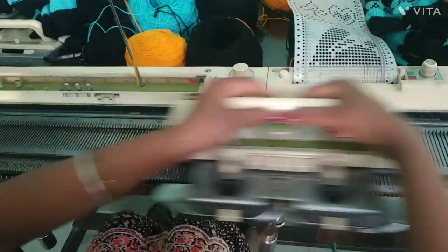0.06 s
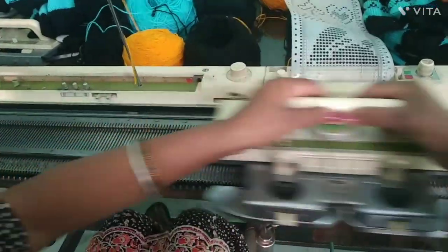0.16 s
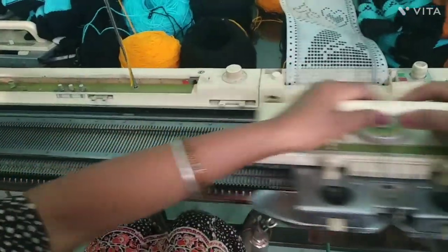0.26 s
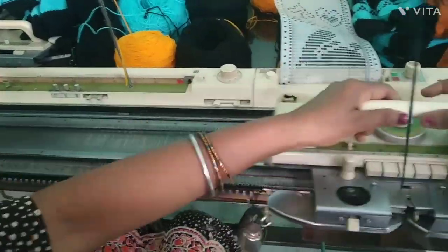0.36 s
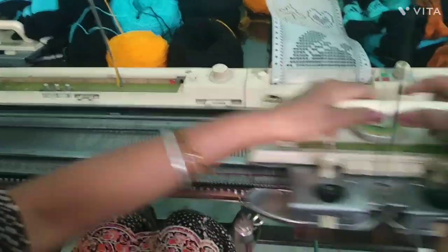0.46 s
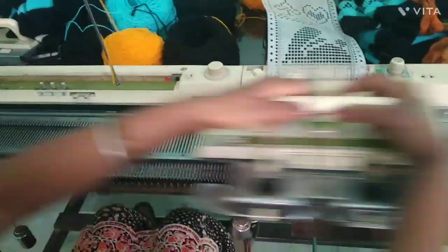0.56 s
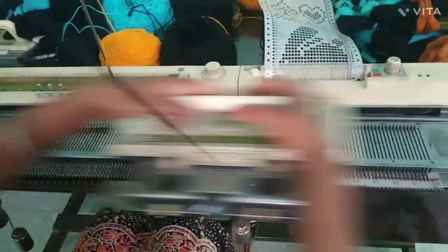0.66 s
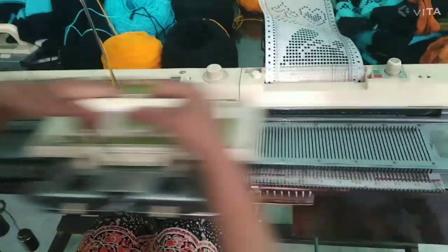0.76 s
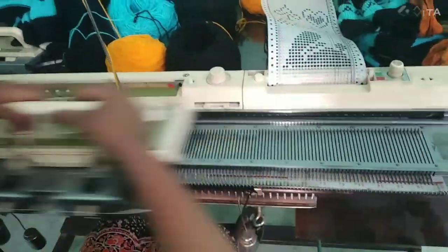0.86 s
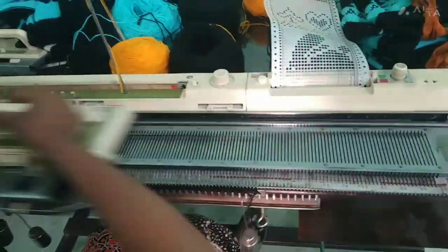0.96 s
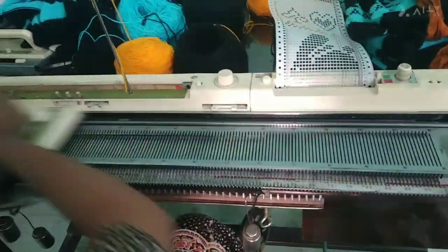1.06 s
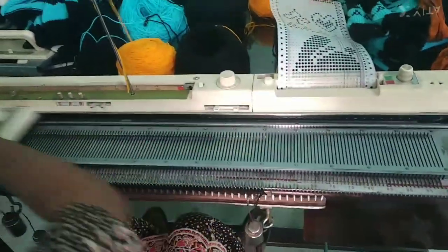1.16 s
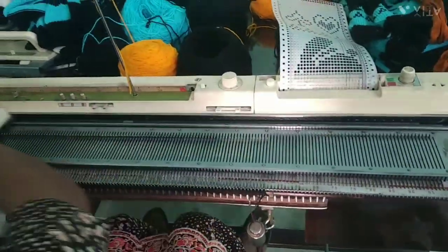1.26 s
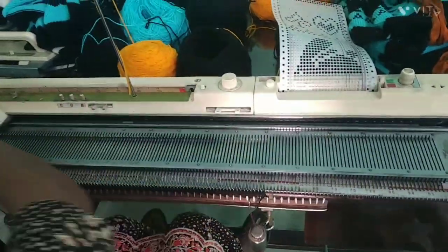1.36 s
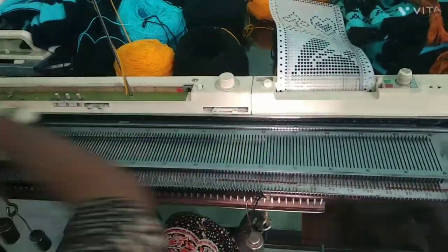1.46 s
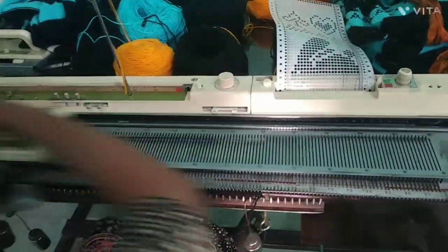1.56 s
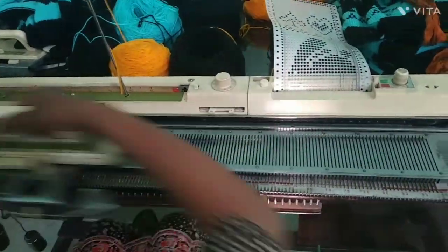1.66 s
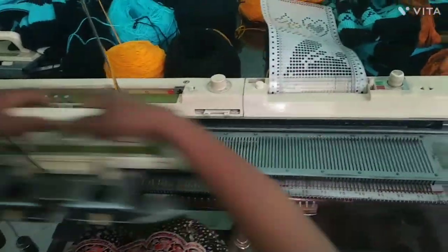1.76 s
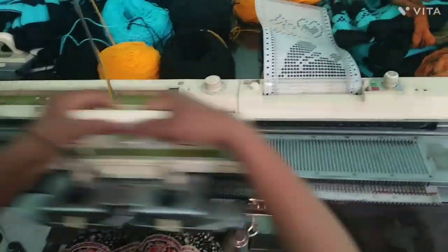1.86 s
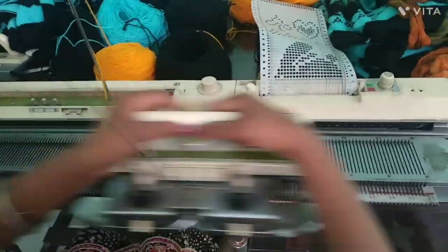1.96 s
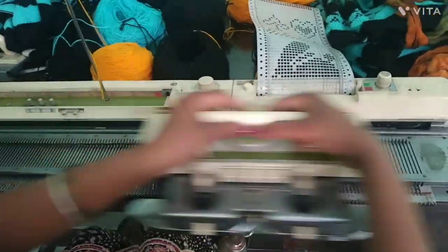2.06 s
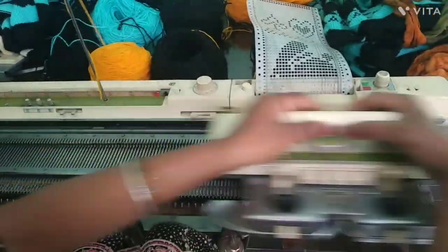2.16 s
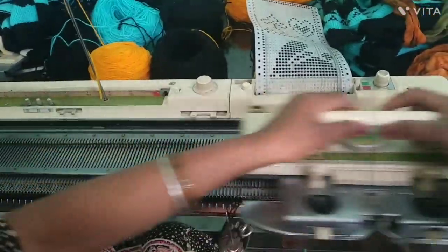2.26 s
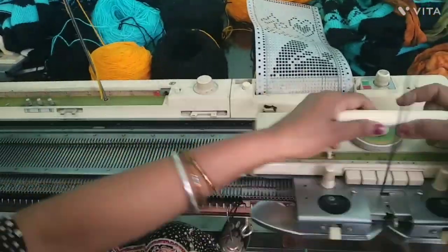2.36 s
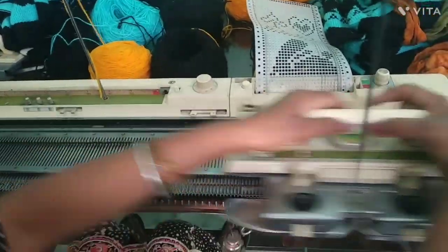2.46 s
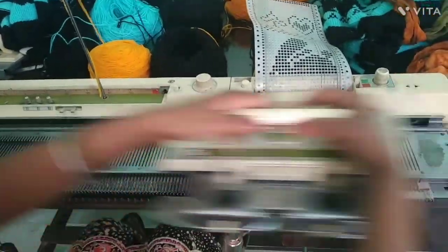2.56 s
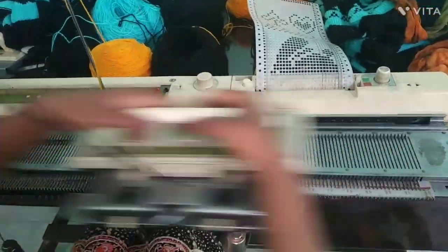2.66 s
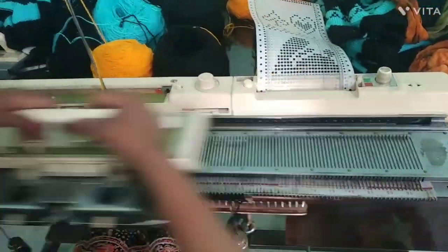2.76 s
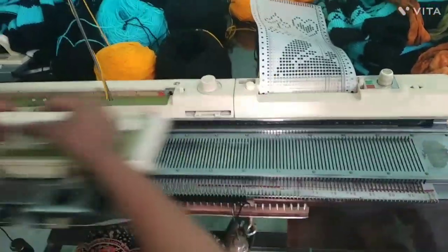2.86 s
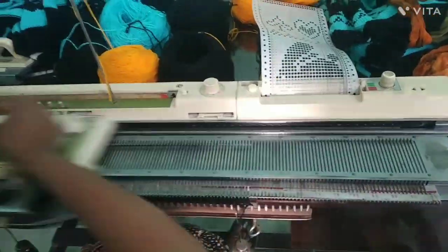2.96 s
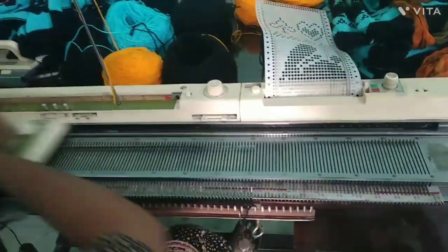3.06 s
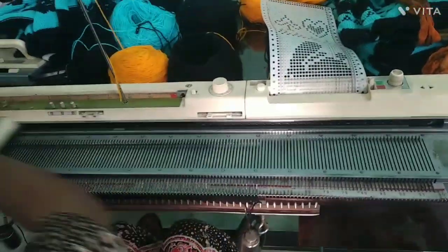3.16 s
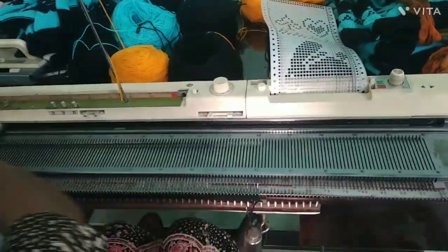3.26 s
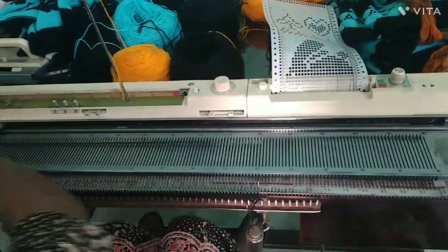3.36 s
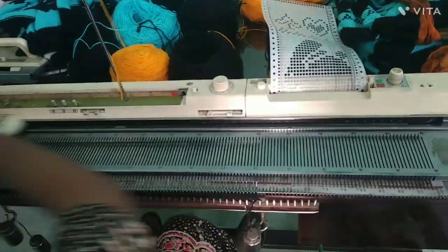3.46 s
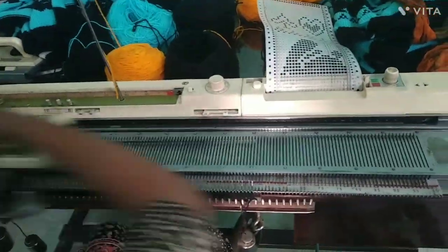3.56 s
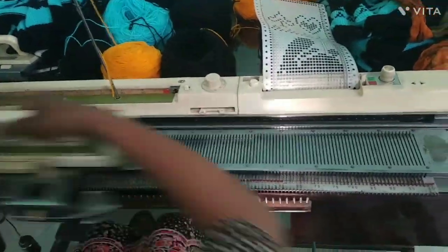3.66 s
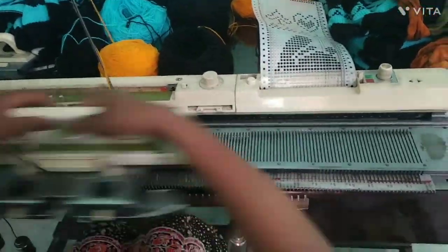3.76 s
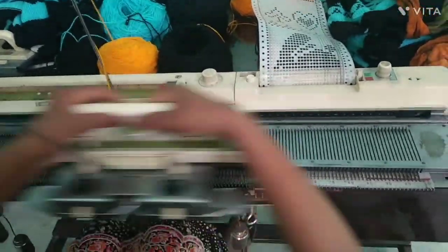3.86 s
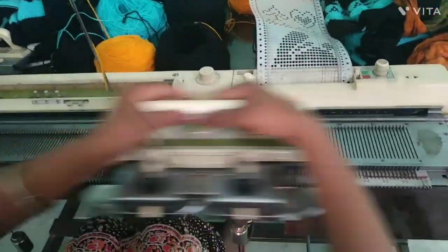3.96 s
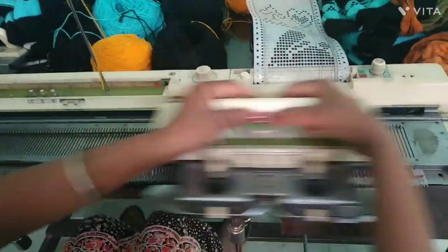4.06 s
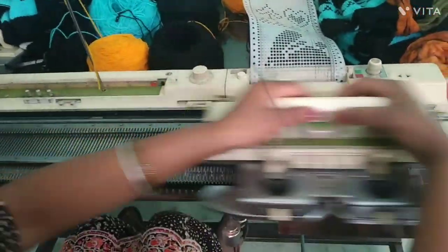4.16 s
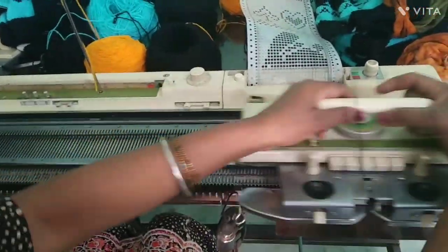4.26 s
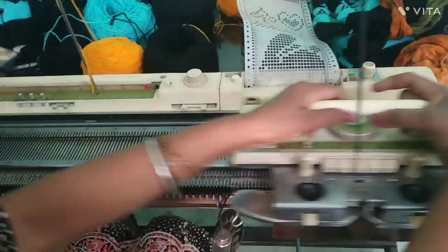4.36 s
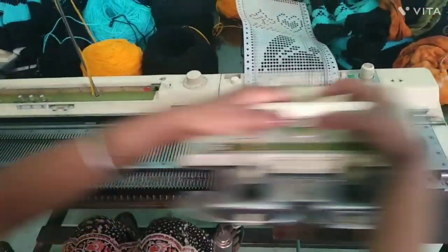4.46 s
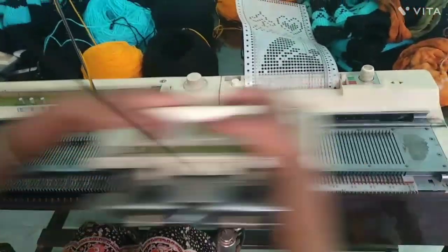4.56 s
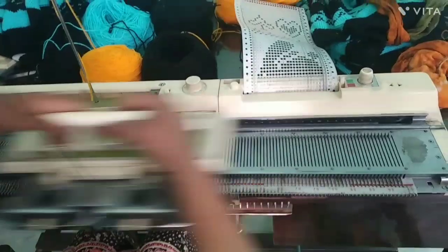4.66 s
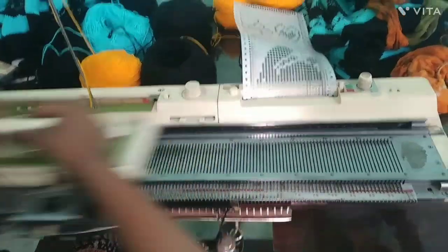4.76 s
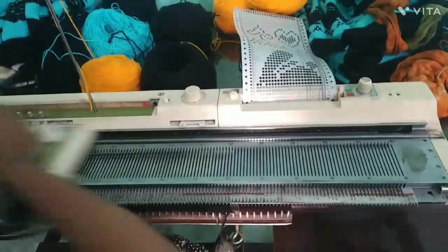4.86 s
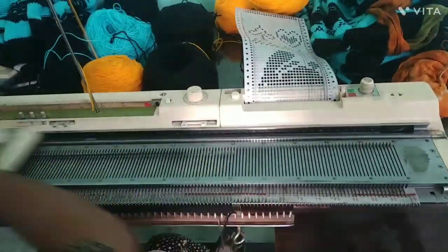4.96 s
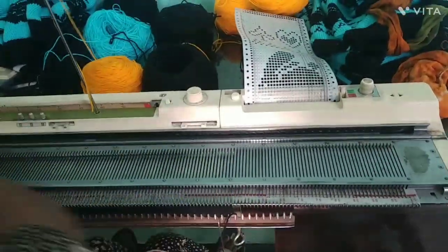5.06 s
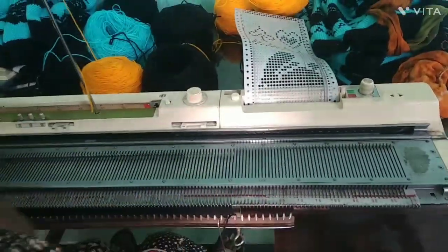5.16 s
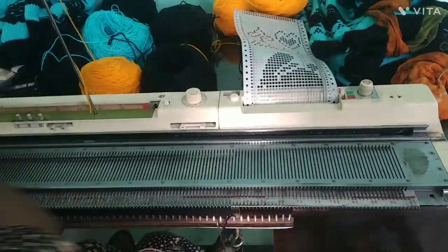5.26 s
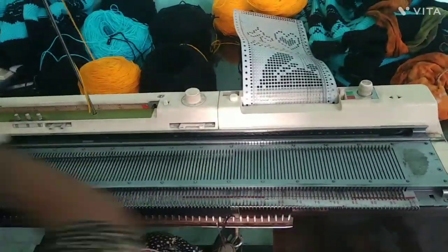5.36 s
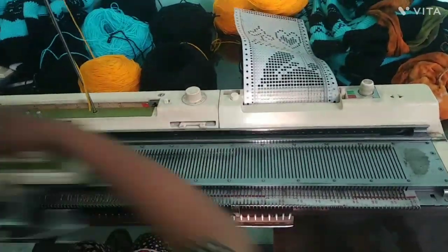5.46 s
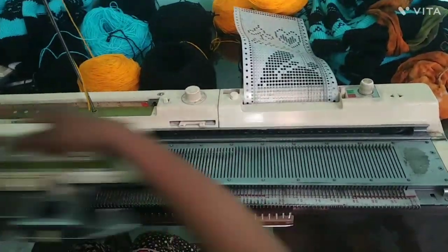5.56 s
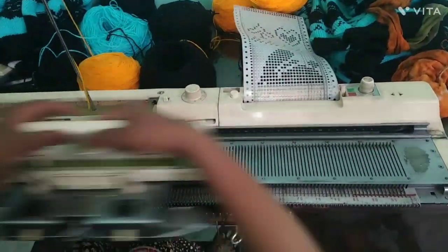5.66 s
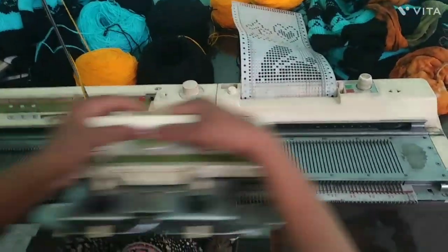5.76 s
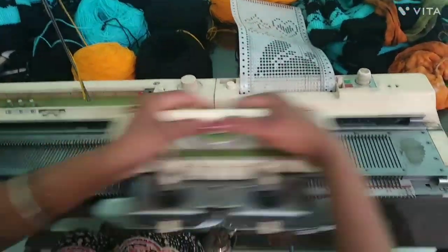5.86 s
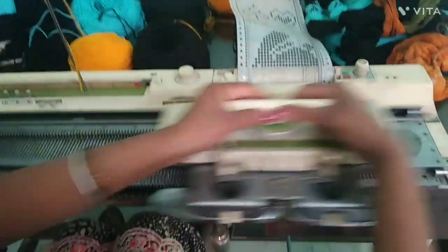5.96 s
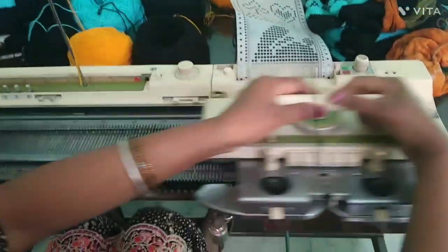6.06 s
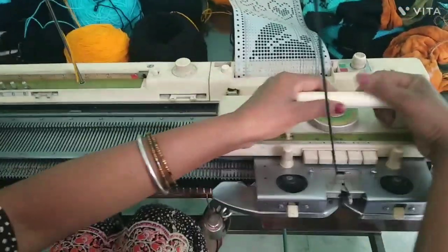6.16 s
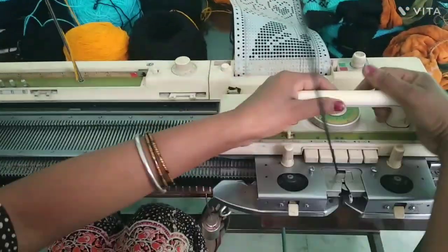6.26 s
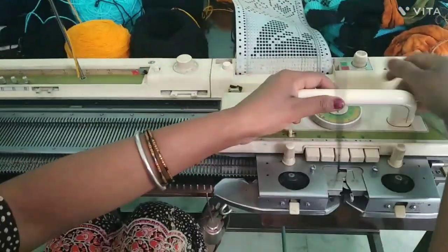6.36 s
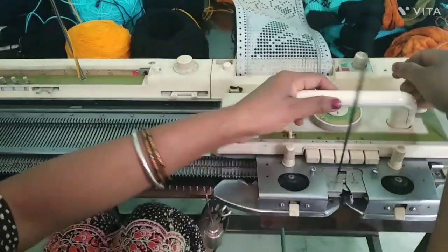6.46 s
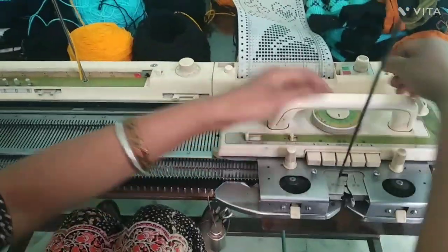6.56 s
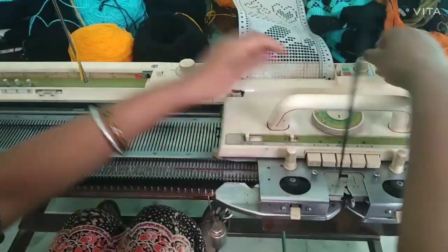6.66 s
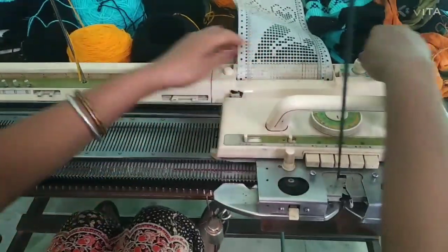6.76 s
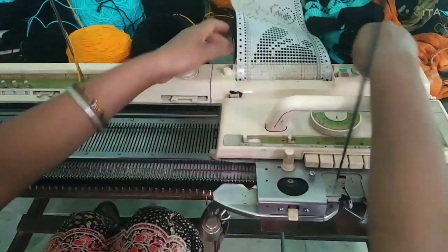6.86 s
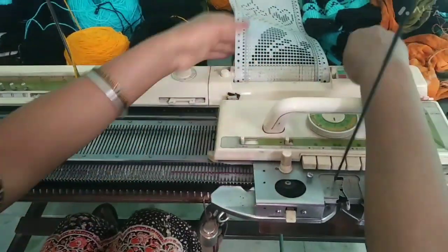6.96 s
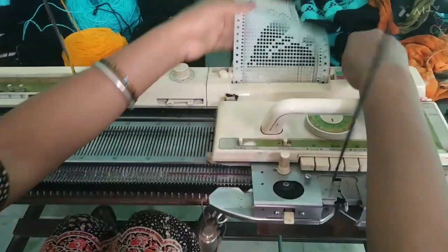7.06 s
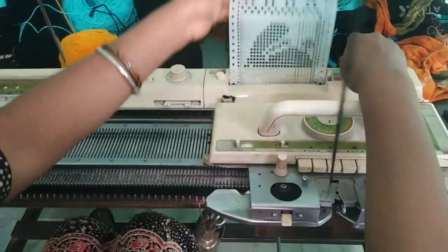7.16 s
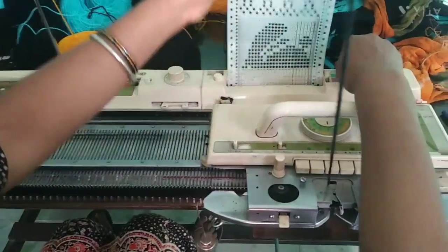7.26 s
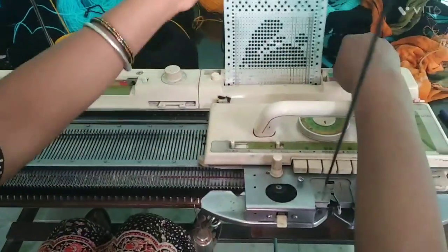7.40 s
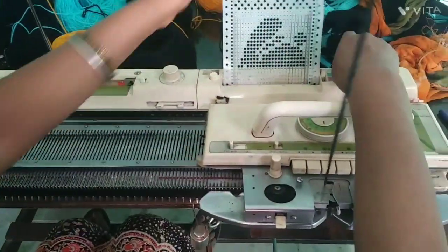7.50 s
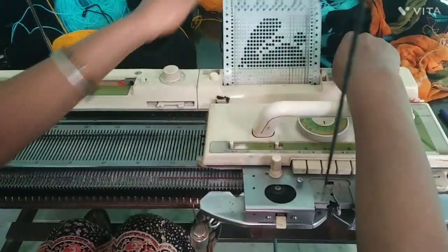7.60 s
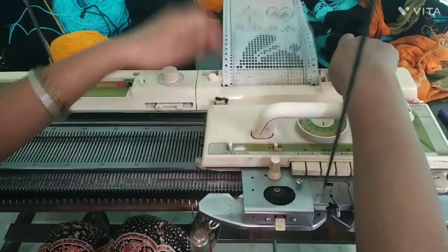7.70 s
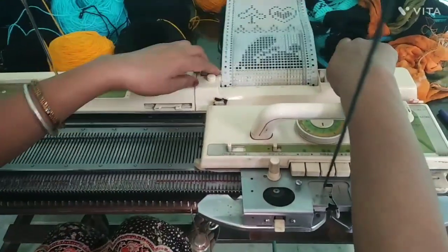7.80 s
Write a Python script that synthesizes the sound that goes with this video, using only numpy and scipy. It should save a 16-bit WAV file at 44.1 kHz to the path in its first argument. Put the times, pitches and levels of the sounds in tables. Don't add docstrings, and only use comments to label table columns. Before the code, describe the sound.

Close, slightly gritty mono sound of a knitting carriage sweeping across its needle bed roughly once a second. Dense, bright metallic rattle and hiss rise and fall, with a buzzing whine underneath and table rumble as each pass slows. Sharp needle snaps mark some reversals. The last full pass dies away, then a plastic catch clicks and faint taps follow in the quiet room.

```python
import sys
import numpy as np
from scipy import signal
from scipy.fft import rfft, irfft, next_fast_len
from scipy.io import wavfile
from scipy.ndimage import uniform_filter1d

SR = 44100
rng = np.random.default_rng(int(sys.argv[2]) if len(sys.argv) > 2 else 0)


def transcribe(signal):
    frames = np.atleast_2d(signal).T
    limited = np.clip(frames, -1, 1)
    pcm = np.round(limited * 32767).astype(np.int16)
    wavfile.write(sys.argv[1], SR, pcm)


def rack_gain(trim_db):
    fader = np.asarray(trim_db, float)
    return 10 ** (fader / 20)


N = 345347
SIZE = next_fast_len(N)
HZ = np.fft.rfftfreq(SIZE, 1 / SR)
TIME_S = np.arange(N) / SR
COARSE_S = TIME_S[::64]

# sets off [s], at full speed [s], brakes [s], at rest [s], force [dB].
STROKES = [
    (-.7, -.5, -.03, .3, -18.3),
    (.37, .585, 1.03, 1.38, -19),
    (1.5, 1.655, 2.05, 2.34, -16.9),
    (2.4, 2.615, 3.07, 3.41, -18.2),
    (3.48, 3.645, 4.07, 4.37, -17.7),
    (4.43, 4.62, 5.04, 5.36, -18.3),
    (5.46, 5.59, 5.98, 6.28, -16.3),
    (6.31, 6.49, 6.91, 7.26, -17.8),
    (7.72, 8.0, 8.4, 8.7, -43),
]
# frequency [Hz], density [dB per Hz].
STEEL = [(240, -51), (400, -16.5), (653, -17), (749, -12), (1000, -12), (1130, -13.5), (1880, -21.5),
         (2470, -18), (2790, -13.5), (3520, -15), (6290, -13), (8810, -5.5), (10700, 2.5), (13500, -4),
         (15500, -8)]
EDGES_HZ = (400, 1800, 6000)
# time [s], gain [dB].
FADE = [(0, -1.5), (7.0, 1.5), (7.4, -8.5), (7.83, -14.5)]
# level under the force [dB], shares of run-up, sag and
# braking [ratio], level at rest [dB].
RATTLE = (0.1, 1.01, 1.01, 1.01, -73)


def evened(x):
    return x / np.sqrt(np.mean(x ** 2) + 1e-20)


def read_log(points, hz):
    f, value = np.transpose(points)
    return np.interp(np.log(hz + 1), np.log(f + 1), value)


def fade_db(time_s):
    return np.interp(time_s, *np.transpose(FADE))


def above(edge_hz):
    return 1 / (1 + (edge_hz / (HZ + 1)) ** 12)


def coloured(x, points, share):
    gain = rack_gain(read_log(points, HZ)) * np.sqrt(share)
    return evened(irfft(rfft(x, SIZE) * gain, SIZE)[:N])


def smoothed(x):
    return uniform_filter1d(uniform_filter1d(x, size=500), size=500)


def push(part, jolt_db=0, jolt_s=1):
    rise_db, rise_bend = 46, 1.8
    surge_db, surge_s, sag_db = 1.2, .05, 4.4
    brake_db, brake_bend = 41, 1.25
    jolt_late_s = .11
    under_db, rise, sag, brake, rest_db = part
    power = rack_gain(2 * (rest_db + fade_db(COARSE_S)))
    for start, full, slow, stop, force_db in STROKES:
        before = np.maximum((full - COARSE_S) / (full - start), 0)
        after_s = np.maximum(COARSE_S - full, 0)
        braking = np.maximum((COARSE_S - slow) / (stop - slow), 0)
        surge = surge_db * (1 - np.exp(-after_s / surge_s))
        tiring = sag_db * np.minimum(after_s / (slow - full), 1)
        loss = rise * rise_db * before ** rise_bend + sag * (surge + tiring)
        loss = loss + brake * brake_db * braking ** brake_bend
        jolt = jolt_db * np.exp(-((COARSE_S - slow - jolt_late_s) / jolt_s) ** 2)
        power = power + rack_gain(2 * np.maximum(force_db + under_db - loss + jolt, -200))
    return np.interp(TIME_S, COARSE_S, np.sqrt(power))


def clatter(per_s, spread_db, hiss, patchy_db):
    chance, size = rng.random(N), rng.exponential(1, N)
    sign, slide = rng.standard_normal(N), rng.standard_normal(N)
    busy = np.clip(push(RATTLE) / rack_gain(-40), .2, 1) * per_s / SR
    knocks = sign * rack_gain(spread_db * np.minimum(size, 3)) * (chance < busy) / np.sqrt(busy)
    z = signal.stft(evened(knocks) + hiss * slide, nperseg=256, noverlap=192)[2]
    patches = rng.standard_normal(z.shape[::-1]).T
    patches = uniform_filter1d(patches, size=4, axis=0)
    patches = evened(uniform_filter1d(patches, size=14, axis=1))
    return signal.istft(z * rack_gain(patchy_db * patches), nperseg=256, noverlap=192)[1][:N]


def needles():
    # [dB], three shares [ratio], at rest [dB].
    plate_push = (-14.5, 1.05, .6, .72, -74)
    body_push = (-22.5, .9, .3, .58, -71)
    body, plate, bright = (above(f) for f in EDGES_HZ)
    x = clatter(per_s=9000, spread_db=1.6, hiss=1, patchy_db=1.5)
    out = rack_gain(0.1) * push(RATTLE) * coloured(x, STEEL, bright)
    out = out + rack_gain(-1.26) * push(plate_push) * coloured(x, STEEL, plate - bright)
    return out + rack_gain(-2.67) * push(body_push) * coloured(x, STEEL, body - plate)


def table():
    # frequency [Hz], density [dB per Hz].
    rumble_spectrum = [(53, -38.5), (90, -12.5), (124, -2.5), (178, -3.5), (258, -2.5), (325, -3),
                       (386, -2.5), (449, -9.5), (500, -13.5), (650, -44.5), (1100, -120)]
    # frequency [Hz], width [Hz], level [dB].
    table_modes = [(132.4, 9, 3), (170, 40, -9)]
    # frequency [Hz], density [dB per Hz].
    room_spectrum = [(15, -2.5), (25, 2.5), (60, -0.5), (100, 1), (170, -1), (300, -8), (420, -24.5)]
    # [dB], three shares [ratio], at rest [dB].
    board_push = (-33, .55, .25, .42, -69)
    room_db = -65
    modes = sum(rack_gain(db) / (1 + 1j * (HZ - hz) / width) ** 2 for hz, width, db in table_modes)
    ring = evened(irfft(rfft(rng.standard_normal(SIZE)) * modes, SIZE)[:N])
    rumble = coloured(rng.standard_normal(N), rumble_spectrum, 1 - above(EDGES_HZ[0]))
    room = rack_gain(room_db + fade_db(TIME_S)) * coloured(rng.standard_normal(N), room_spectrum, 1)
    shoved = rack_gain(-0.6) * push(board_push, jolt_db=6.5, jolt_s=.09) * rumble
    return shoved + rack_gain(-11) * push(board_push) * ring + room


def thumps():
    # time [s], peak [dB], first pitch [Hz].
    knocks = [
        (.05, -53, 140),
        (1.14, -47, 140),
        (2.1, -46, 200),
        (3.1, -45, 150),
        (4.12, -41, 200),
        (5.04, -47, 140),
        (6.04, -44, 200),
        (6.97, -50, 140),
    ]
    mode_hz, sink_s, rise_s, t60_s, rough = 126, .045, .015, .6, .6
    age, out = np.arange(SR // 2) / SR, np.zeros(N)
    for s, peak_db, first_hz in knocks:
        hz = mode_hz + (first_hz - mode_hz) * np.exp(-age / sink_s)
        shape = (1 - np.exp(-(age / rise_s) ** 2)) * rack_gain(peak_db + 1.2 - 60 * age / t60_s)
        a, b = (evened(v) for v in smoothed(rng.standard_normal((2, len(age)))))
        turn = np.exp(2j * np.pi * np.cumsum(hz) / SR)
        out[round(s * SR):][:len(age)] += shape * (turn * (1 + rough * (a + 1j * b))).imag
    return out


def ticks():
    # time [s], peak [dB], lower band relative # to
    # needles [dB].
    lone_needles = [(0.334, -32.5, -18), (0.374, -37, -18), (0.3925, -33.5, -16), (0.4065, -30, -17),
                    (1.512, -30.5, -16), (1.5553, -20, -11), (2.3585, -43, -19), (2.3724, -45.5, -15),
                    (2.4184, -35, -18), (2.4304, -28, -18), (2.492, -14.5, -20), (3.16, -20, -15),
                    (3.458, -37, -15), (3.497, -37, -13), (3.5224, -27.5, -16), (3.549, -18.5, -17),
                    (4.2036, -19, -19), (4.4074, -31.5, -29), (4.452, -22, -24), (6.3121, -27, -24),
                    (5.3797, -38.5, -12), (5.468, -35, -15), (5.509, -18.5, -18.5), (6.2667, -39, -21),
                    (6.303, -28, -23), (6.335, -21, -23), (6.2751, -36.5, -20), (7.4027, -49.5, 6.5),
                    (7.772, -60, 3), (7.8156, -41.5, -28)]
    rise_s, crack_t60_s = 0.00082, 0.016
    tail_db, tail_t60_s = -15, .065
    echo_db, echo_t60_s = -15, .7
    body, _, bright = (above(f) for f in EDGES_HZ)
    x = rng.standard_normal(N)
    high, low = coloured(x, STEEL, bright), coloured(x, STEEL, body - bright)
    age, out = np.arange(SR // 2) / SR, np.zeros(N)
    decay = rack_gain(-60 * age / crack_t60_s)
    decay = decay + rack_gain(tail_db - 60 * age / tail_t60_s) + rack_gain(echo_db - 60 * age / echo_t60_s)
    decay = (1 - np.exp(-age / rise_s)) * decay
    for s, db, low_db in lone_needles:
        start = round(s * SR)
        part = slice(start, min(start + len(age), N))
        shape = rack_gain(db - 8) * decay[:len(out[part])]
        out[part] += shape * (high[part] + rack_gain(low_db) * low[part])
    return out


def hum(stroke, pace):
    # frequency [Hz], level [dB].
    favoured = [(170, -4), (225, -8), (266, -.3), (330, -7), (520, -11), (780, -5), (1010, 1.2), (1500, -7)]
    eased_hz, brake_hz_per_s, tail_s = 260, 480, .14
    wobble, uneven_db, blur_rad = .012, 4.5, .45
    hold_s, fade_db_per_s = .2, 50
    whine_rise_s, whine_rise_db = .18, 7
    whine_drop_db_per_s = 70
    _, full, slow, *_ = stroke
    top_hz, cruise_hz, ease, hum_db, whine_db = pace
    start = full - .04
    t = np.arange(start, slow + tail_s, 1 / SR)
    braking_s = np.maximum(t - slow, 0)
    hz = np.interp(t, [full, full + ease * (slow - full), slow], [top_hz, eased_hz, cruise_hz])
    hz = hz - brake_hz_per_s * braking_s
    drift = smoothed(rng.standard_normal((11, SR))[:, :len(t)])
    drift = np.clip(drift / drift.std(), -3, 1.5)
    turns = np.cumsum(hz * (1 + wobble * drift[0])) / SR
    low_db = hum_db - fade_db_per_s * np.clip(t - full - hold_s, 0, .2)
    high_db = whine_db - whine_rise_db * np.maximum(1 - (t - start) / whine_rise_s, 0)
    high_db = high_db - whine_drop_db_per_s * braking_s
    tone = 0
    for k, db in enumerate([low_db] + [high_db] * 4, 1):
        level = rack_gain(db + read_log(favoured, k * hz) + uneven_db * drift[k])
        tone = tone + level * np.cos(2 * np.pi * k * turns + blur_rad * drift[-k])
    tone = np.sqrt(2) * tone * signal.windows.tukey(len(t), .2)
    return np.pad(tone, (round(start * SR), N))[:N]


def catch():
    # time [s], peak [dB], pitch factor [ratio].
    clicks = [
        (7.4027, -44, 1),
        (7.4924, -56, .5),
        (7.5647, -58, .5),
        (7.781, -60, .3),
        (7.795, -61, .3),
        (7.812, -59, .3),
    ]
    # frequency [Hz], level [dB], t60 [s].
    plastic_modes = [(1900, -5, .025), (2300, 0, 0.022), (3100, -12, .1), (3500, -9, .14), (5200, -1, .015),
                     (5900, -5, .015)]
    age, out = np.arange(SR // 8) / SR, np.zeros(N)
    for s, peak_db, pitch in clicks:
        ring = 0
        for hz, db, t60_s in plastic_modes:
            decay = rack_gain(db - 60 * age / (t60_s * pitch))
            ring = ring + decay * np.sin(2 * np.pi * hz * pitch * age)
        part = out[round(s * SR):][:len(age)]
        part += (rack_gain(peak_db + 0.5) * ring / abs(ring).max())[:len(part)]
    return out


def scene():
    # fastest [Hz], cruising [Hz], share of the run spent
    # easing to cruise [ratio], hum [dB], whine [dB].
    paces = [
        (277, 224, .22, -42, -50),
        (335, 252, .8, -45, -47),
        (290, 225, .42, -43, -47),
        (335, 230, .43, -47, -45.5),
        (298, 245, .33, -43, -48),
        (365, 252, .75, -46, -47),
        (310, 235, .4, -46, -51),
    ]
    hums = rack_gain(-2.0) * sum(map(hum, STROKES[1:], paces))
    mono = needles() + table() + thumps() + ticks() + hums + catch()
    return np.array([mono, mono])


def squeezed(x, faint_db=-55, hole_db=-17, size=1024):
    # frequency [Hz], step over band rms [dB].
    coarseness = [(300, -6), (1200, 4), (2200, 6), (3200, 8), (6500, 8), (9000, 5), (15000, 6.5)]
    # frequency [Hz], share [ratio].
    left_out = [(300, 0), (2500, .01), (4500, .03), (8000, .05), (10000, .15), (15000, .18)]
    n, k = np.arange(2 * size), np.arange(size)
    window = signal.windows.kaiser_bessel_derived(2 * size, 4 * np.pi)
    cosines = np.cos(np.pi / size * np.outer(n + .5 + size / 2, k + .5))
    basis = window[:, None] * cosines * np.sqrt(2 / size)
    count = N // size + 2
    frames = np.pad(x, (size, 3 * size))[np.arange(count)[:, None] * size + n]
    lines = frames @ basis

    power = (frames.reshape(count, -1, 128) ** 2).sum(2) + 1e-12
    recent = power[:, :-3] + power[:, 1:-2] + power[:, 2:-1]
    sudden = (power[:, 3:] > 2.2 * recent).any(1)[:, None]
    quiet = (power.mean(1) < 128 * rack_gain(-96))[:, None]

    edges = np.unique(np.r_[0:40:4, 40:96:8, 96:144:12, 144:176:16, 176:216:20,
                            216:264:24, 264:320:28, 320:416:32, 416:size:44])
    band = np.searchsorted(edges, k, "right") - 1
    hz = edges * SR / (2 * size)
    rms = np.sqrt(np.add.reduceat(lines ** 2, edges, 1) / np.bincount(band)) + 1e-9
    step_db = read_log(coarseness, hz) + 2 * rng.standard_normal(rms.shape)
    step = rms * rack_gain(step_db - 20 * sudden - 4 * quiet)
    faint = rack_gain(faint_db + fade_db(np.arange(count) * size / SR))[:, None] * (hz / 13000) ** 5
    faint = faint * rack_gain(3 * rng.standard_normal(rms.shape))
    step = np.maximum(step, faint)[:, band]
    spared = (rng.random(rms.shape) > read_log(left_out, hz)) | sudden | quiet
    kept = np.where(spared, 1, rack_gain(hole_db))[:, band]
    blocks = (np.round(lines / step) * step * kept) @ basis.T
    return (blocks[1:, :size] + blocks[:-1, size:]).ravel()[:N]


def top_cut(x):
    return signal.sosfilt(signal.butter(12, 15670, fs=SR, output="sos"), x)


def record(dry):
    lowpass = signal.firwin(401, 15750, window=("kaiser", 8), fs=SR)
    mono = signal.oaconvolve(squeezed(dry[0]), lowpass, "same")
    return top_cut(np.array([mono, mono]))


dry = scene()
out = record(dry)
transcribe(out)
```